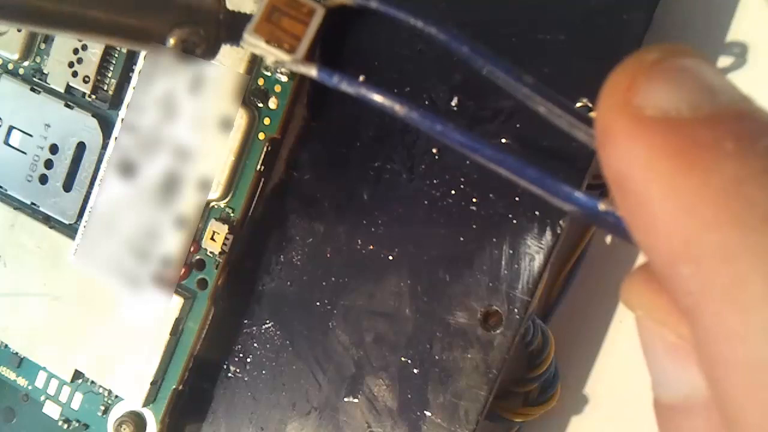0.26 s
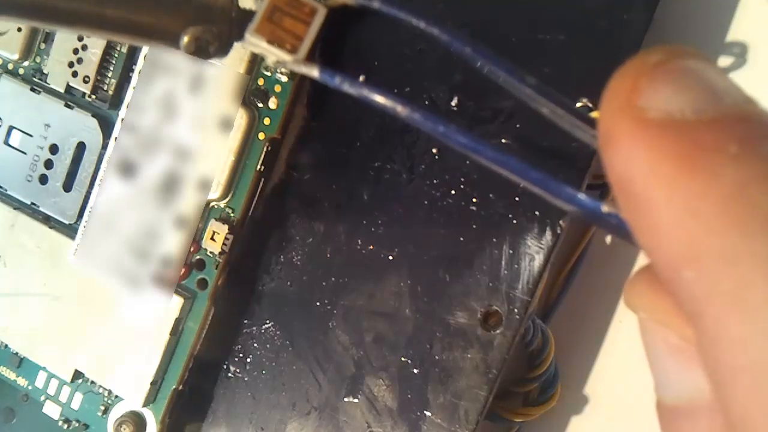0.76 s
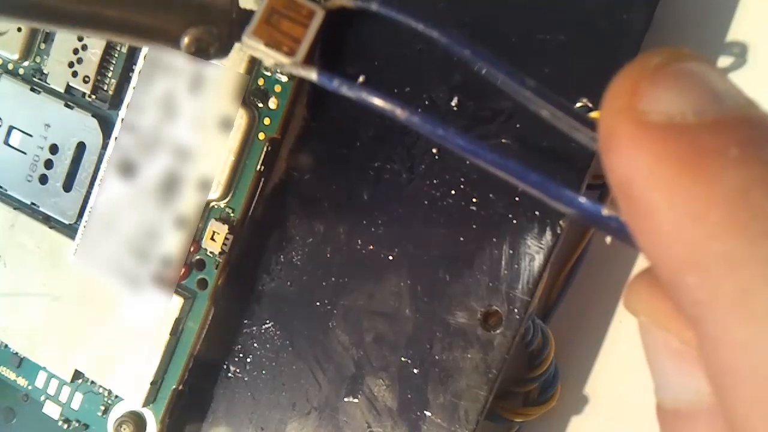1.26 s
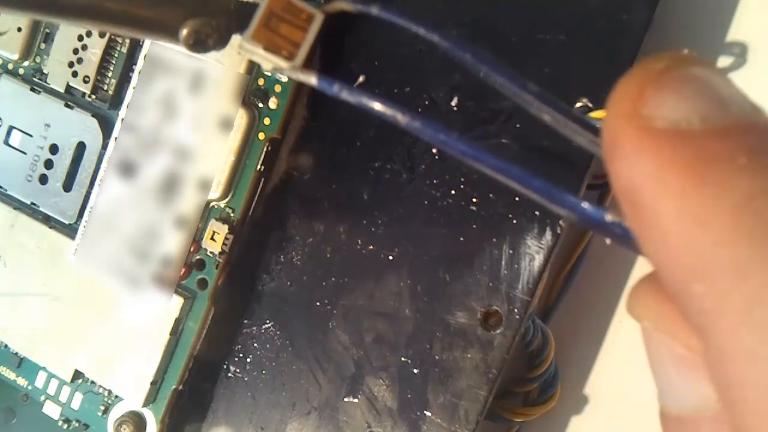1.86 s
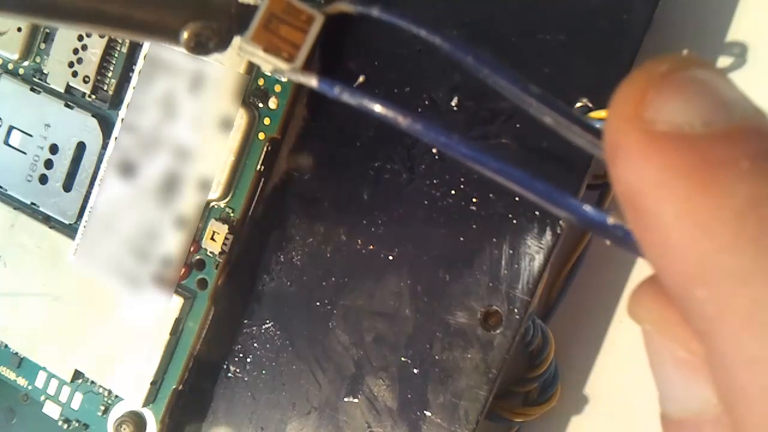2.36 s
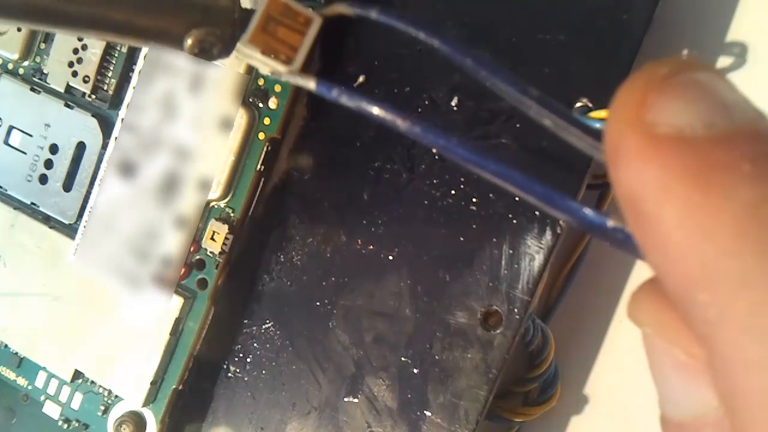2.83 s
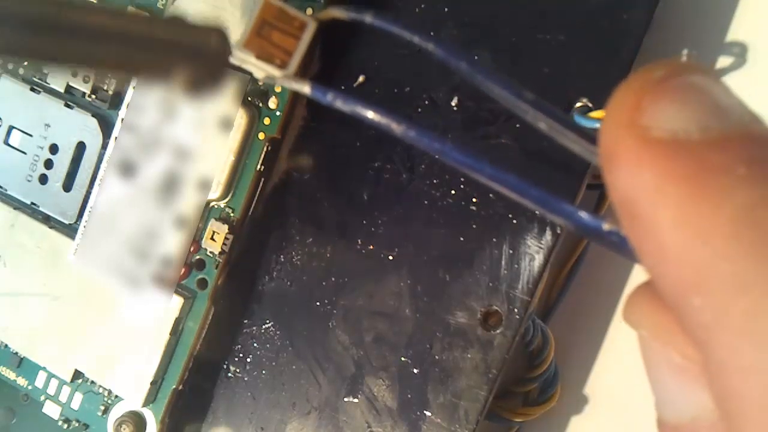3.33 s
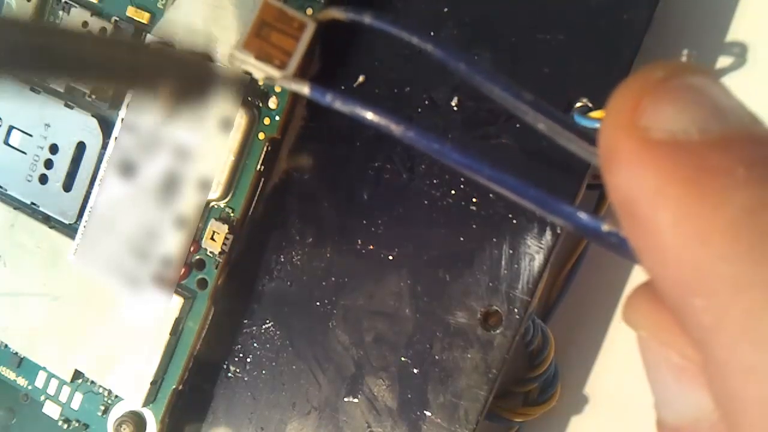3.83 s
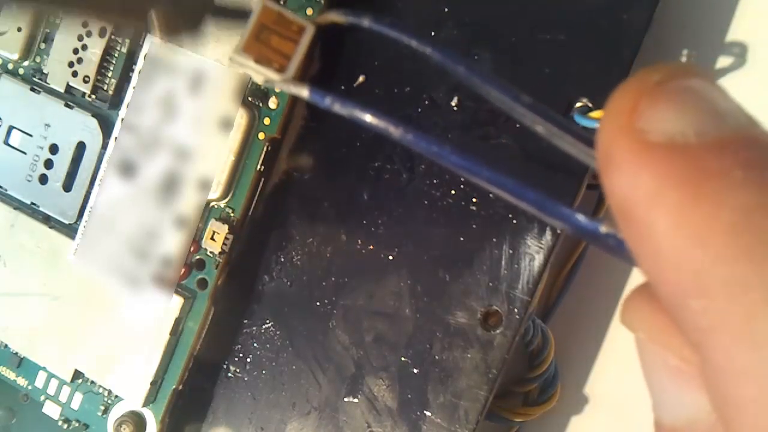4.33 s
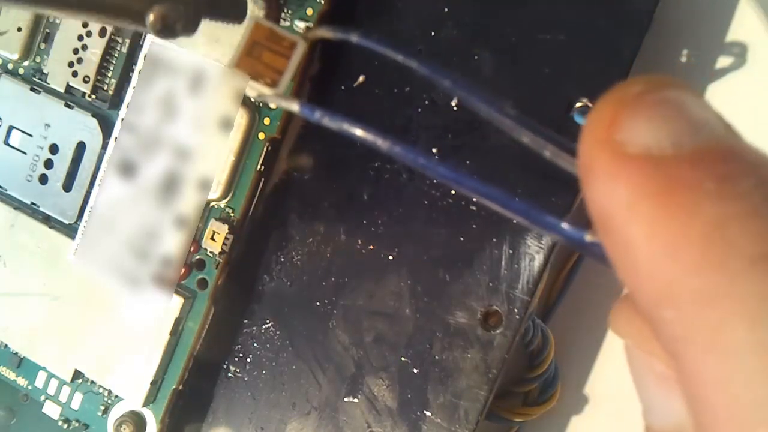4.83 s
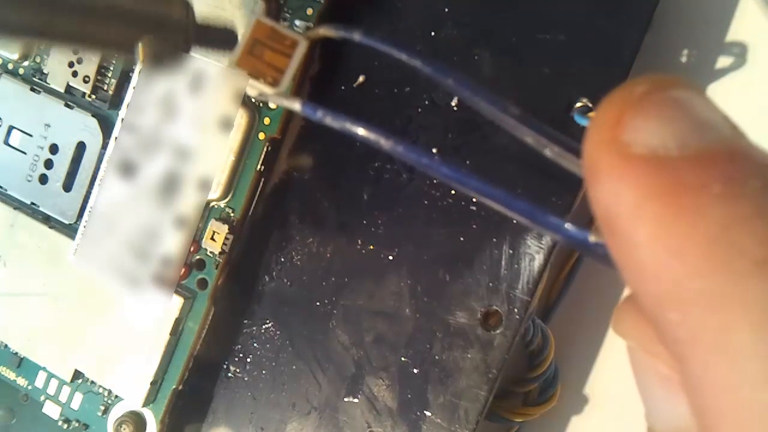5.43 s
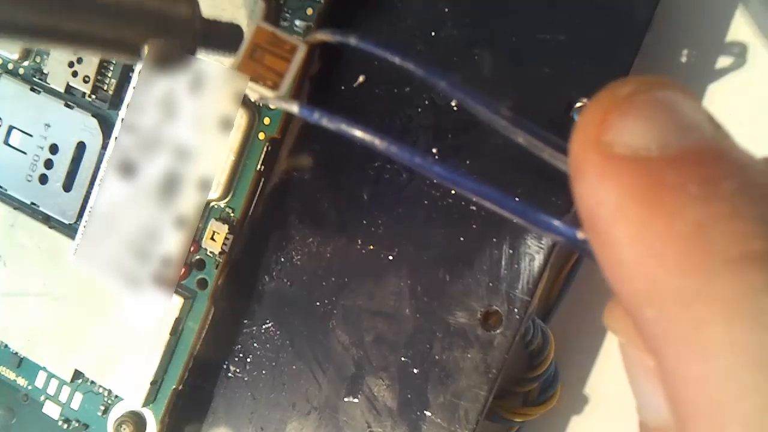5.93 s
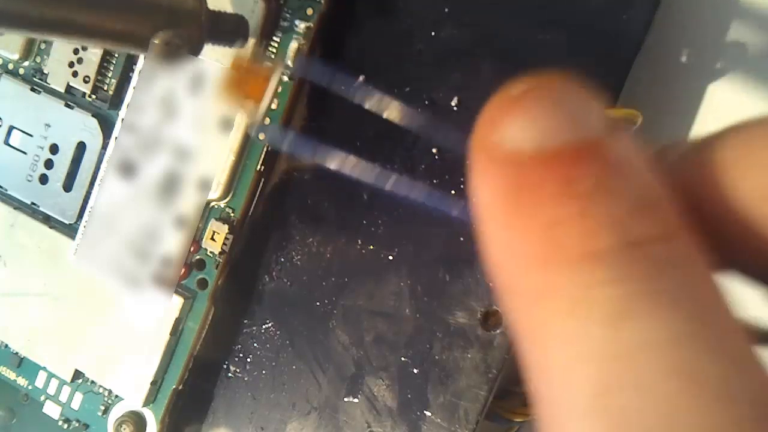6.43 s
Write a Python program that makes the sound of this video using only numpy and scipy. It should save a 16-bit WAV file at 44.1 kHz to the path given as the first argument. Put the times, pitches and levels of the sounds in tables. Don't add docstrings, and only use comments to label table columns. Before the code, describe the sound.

For about 6.7 seconds a hot-air gun runs steadily, close to a small camera microphone over a workbench, with no start or stop. A wide, bright rush of air dominates, strong in the upper mids and treble, with a hollow ringing from the barrel. Inside it sits a thin, steady fan whine near 1650 Hz, creeping up slightly, with other blower tones; a higher one fades between 0.8 and 2.3 seconds. High, wavering whistles catch at 0.05 to 0.2 seconds, around 2.1, from 3.6 to 4.3, and from 6.2 to the end. Brief grille rings flare near 0.55, 1.3, 1.6 and 4.4 seconds. Hiss swells flicker between them, sharpest near 3.7. Loudness wavers only slightly, dipping near 4.7 and brightening around 6.3. Faint low rumble lies underneath, easing slightly stronger or weaker only late, around 6.1. The treble is grainy, metallic and abruptly cut off at the top.

```python
import sys
import numpy as np
from scipy import signal
from scipy.fft import rfft, irfft
from scipy.io import wavfile
from scipy.ndimage import map_coordinates

SR = 44100
rng = np.random.default_rng(int(sys.argv[2]) if len(sys.argv) > 2 else 0)


def store_pcm(level_fs):
    pcm = np.round(np.clip(level_fs, -1, 1) * 32767).astype(np.int16)
    wavfile.write(sys.argv[1], SR, np.atleast_2d(pcm).T)


def volts(x):
    e = np.asarray(x, float) / 20
    return 10 ** e


N = 295029
TIME = np.arange(N) / SR
HZ = np.maximum(np.arange(N // 2 + 1) * SR / N, 1)
CAMERA_RATE = 16002.26

# time in seconds, blade tone in Hz.
BLADE_TONE = [(0, 1648), (1, 1651), (2, 1654.5), (3, 1656.5), (4, 1660), (5, 1663.5), (6.69, 1667.5)]
# multiple of the shaft speed, level in dB.
FAINT_ORDERS = [(1, -50), (2, -46), (4, -43.5), (6, -51), (7, -43), (9, -48), (13, -45), (16, -45),
                (17, -47), (20, -46)]
# time in seconds, level in dB.
AIM = [(0, -0.5), (.4, -1.3), (.8, -0.2), (3.4, -0.1), (4.2, 0.5), (4.65, -1), (5.6, -0.7), (5.85, -.3),
       (6.3, 0.7), (6.69, -0.5)]
# frequency in Hz, level in dB per Hz.
RUSH = [(20, -46), (200, -20.5), (480, -18.5), (750, -11), (1250, -14), (1500, -14.5), (1950, -13),
        (2500, -12.5), (3700, -11.5), (4500, -13), (5500, -10.5), (6700, -8.5), (7400, -9.5), (8000, -6)]
# centre in Hz, width in Hz, peak in dB per Hz.
HOUSING = [(268, 26, -13), (358, 35, -11.5), (536, 11, -10.5), (743, 62, -10.5), (1970, 32, -18),
           (2096, 60, -11.5), (2230, 25, -22.5), (2395, 170, -9.5), (2807, 250, -5.5), (3470, 49, -7),
           (3840, 100, -7.5), (3950, 170, -8.5), (4132, 296, -4.5), (4790, 250, -11), (5030, 260, -10.5),
           (5580, 120, -10.5)]
# centre in Hz, width in Hz, peak in dB per Hz.
GRILLE = [(6324, 290, 0)]
# start in seconds, length in seconds, rise in dB.
GRILLE_SWELLS = [
    (.54, .09, 7),
    (1.3, 0.086, 7),
    (1.6, .1, 6),
    (1.85, .15, 1),
    (3.84, .06, 3),
    (4.41, 0.072, 6),
    (5.15, .06, 2.5),
]
# start in seconds, length in seconds, rise in dB, pitch shift in Hz.
EDGE_CATCHES = [(0.042, 0.1203, 9, 40), (0.163, 0.0695, 5.5, 20), (1.25, 0.301, 1, -20), (2.08, .03, 6, 12),
                (2.174, 0.0399, 5.5, 87), (3.57, 0.089, 3, 10), (3.9, .12, 4, 60.5),
                (4.23, 0.049, 4.5, 29.5), (6.157, .12, 4, 60.5), (6.359, 0.044, 6, 61), (6.5, .15, 4, 38.5)]
# start in seconds, length in seconds, rise in dB, pitch shift in Hz.
LIP_SWELLS = [(0.356, .08, 2.5, -60), (.72, .12, 5, -10), (.9, 0.43, 4, -20), (1.9, .17, 5.5, 170),
              (2.16, 0.068, 5.5, -330), (2.331, .2, 2, 100), (2.601, .1, 5, 40), (3.019, .1, 5, 170),
              (3.38, .2, 5.5, 110), (3.699, .08, 8.5, 9.5), (4.058, 0.056, 5.5, 60.5),
              (5.98, .08, 1, 169.5), (6.194, .25, 1, -39.5), (6.504, .15, 6, -78.5)]
# centre in Hz, width in Hz, peak in dB per Hz.
BARREL = [(820, 50, -5), (945, 55, -2), (1035, 80, 0), (1090, 70, -2.5)]
# centre in Hz, width in Hz, peak in dB per Hz.
MOUTH = [(3150, 175, -2), (3350, 110, 0.5), (3450, 110, -2.5)]
# centre in Hz, width in Hz, peak in dB per Hz.
BOARD = [(1748, 180, 0)]
# centre in Hz, width in Hz, peak in dB per Hz.
RUMBLE = [(124.6, 17, -2), (144, 23, -9)]


def rms_one(x):
    return x / np.sqrt(np.mean(x ** 2))


def in_time(rows):
    seconds, values = np.transpose(rows)
    return np.interp(TIME, seconds, values)


def step(span, before, after):
    return np.interp(TIME, span, [before, after])


def noise(power):
    spectrum = rfft(rng.standard_normal(N)) * np.sqrt(power)
    return rms_one(irfft(spectrum * (HZ < CAMERA_RATE / 2), N))


def flutter(rate_hz):
    return noise(1 / (1 + (HZ / rate_hz) ** 2) ** 2)


def resonances(modes):
    return sum(volts(2 * db) / (1 + (2 * (HZ - hz) / width) ** 2) ** 2 for hz, width, db in modes)


def swells(rows):
    ramp_s = 0.047
    total = 0
    for start, length, *values in rows:
        inside_s = np.minimum(TIME - start, start + length - TIME)
        shape = np.clip(inside_s / ramp_s + 0.5, 0, 1)
        total = total + np.outer(values, shape)
    return total


def blower():
    blades, wobble_db = 5, 0.5
    shaft_phase = 2 * np.pi * np.cumsum(in_time(BLADE_TONE) / blades) / SR
    blade_db = -28 - 0.35 * TIME + wobble_db * flutter(0.6)
    slot_db = step((0.05, 1.8), -33, -29.5) + wobble_db * flutter(0.6)
    housing_db = -30.5 + wobble_db * flutter(0.6)
    second_db = step((0.77, 2.3), -31.5, -48)
    strong_orders = [(blades, blade_db), (8, slot_db), (3, housing_db), (2 * blades, second_db)]
    tones = 0
    for order, db in [*strong_orders, *FAINT_ORDERS]:
        order = np.round(order)
        tones = tones + np.sqrt(2) * volts(db) * np.sin(order * shaft_phase + order * order)
    return tones


def air_rush(aim_db):
    hz, db = np.transpose(RUSH)
    broad = volts(2 * np.interp(np.log(HZ), np.log(hz), db))
    level_db = -14 + 0.35 * aim_db + 0.33 * flutter(60)
    return volts(level_db) * noise(broad + resonances(HOUSING))


def barrel_roar():
    return volts(-23 + 0.1351 * TIME) * noise(resonances(BARREL))


def barrel_mouth(aim_db):
    return volts(-24 + 1.9 * aim_db) * noise(resonances(MOUTH))


def grille():
    level_db = -28.5 + swells(GRILLE_SWELLS)[0] + 0.44 * flutter(3.8)
    return volts(level_db) * noise(resonances(GRILLE))


def gliding(steady_db, steady_hz, events, width_hz, flicker_db):
    rise_db, shift_hz = swells(events)
    db = steady_db + rise_db
    hz = steady_hz + shift_hz + 25.03 * flutter(5)
    phase = 2 * np.pi * np.cumsum(hz) / SR
    band = flutter(width_hz) * np.cos(phase) + flutter(width_hz) * np.sin(phase)
    waver = 2 * np.pi * np.cumsum(70 * flutter(60)) / SR
    tone = np.sqrt(2) * np.sin(phase + waver)
    locked = np.clip((db + 23) / 7, 0, 0.75)
    mixed = np.sqrt(1 - locked) * band + np.sqrt(locked) * tone
    return volts(db + flicker_db * flutter(29)) * mixed


def edge_whistle():
    return gliding(-24, 7050, EDGE_CATCHES, width_hz=170, flicker_db=1.0)


def lip_hiss(aim_db):
    return gliding(-25.5 + 0.9 * aim_db, 7670, LIP_SWELLS, width_hz=220, flicker_db=0.34)


def board():
    return volts(step((2.6, 5.2), -43, -33)) * noise(resonances(BOARD))


def bench():
    return volts(step((6.17, 6.1), -48.5, -41)) * noise(resonances(RUMBLE))


def scene():
    aim_db = in_time(AIM)
    jet = air_rush(aim_db) + grille() + edge_whistle() + lip_hiss(aim_db)
    barrel = barrel_roar() + barrel_mouth(aim_db)
    return (blower() + jet + barrel + board() + bench())[None]


def band_limit(x):
    return signal.sosfilt(signal.butter(12, 16060, fs=SR, output="sos"), x)


def record(dry):
    overload, cutoff_hz, slope_hz = 0.8, 15640, 100
    ticks = np.floor(np.arange(N) * CAMERA_RATE / SR) * SR / CAMERA_RATE
    held = map_coordinates(dry[0], [ticks], order=5, mode="mirror")
    clipped = np.clip(held, -overload, overload)
    top_cut = np.clip((cutoff_hz + slope_hz - HZ) / slope_hz, 0, 1) ** 3
    mix = irfft(rfft(clipped) * top_cut, N)
    return band_limit(mix[None])


dry = scene()
out = record(dry)
store_pcm(out)
```